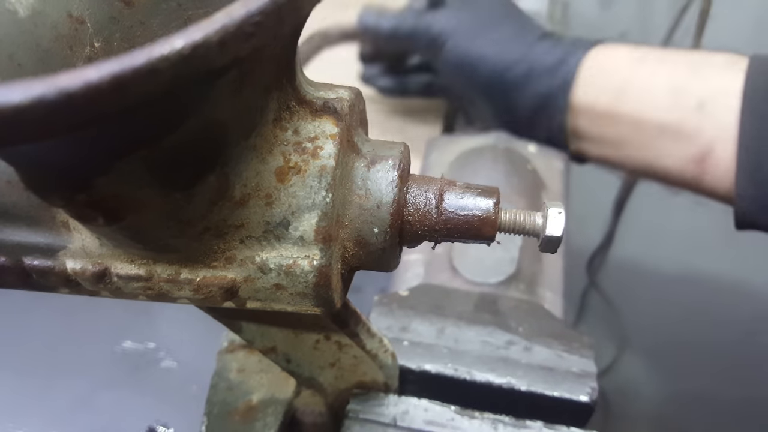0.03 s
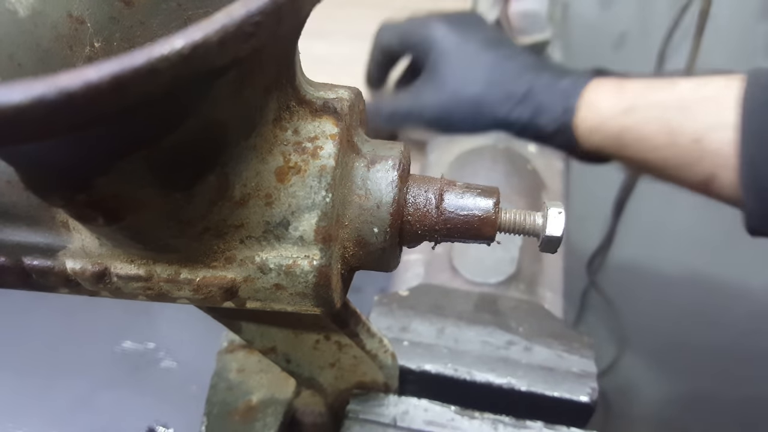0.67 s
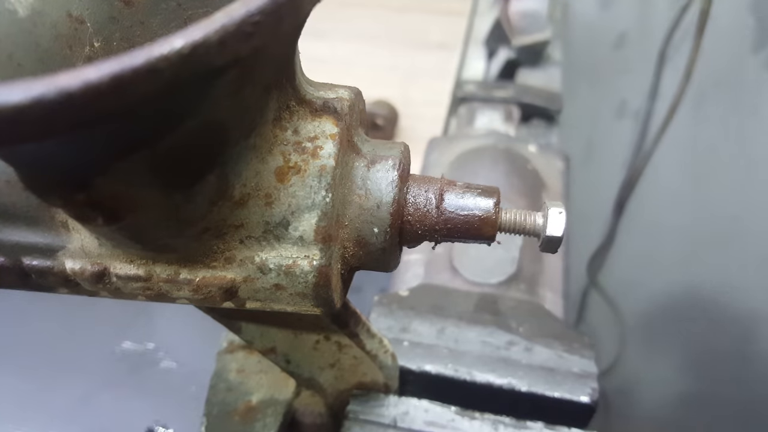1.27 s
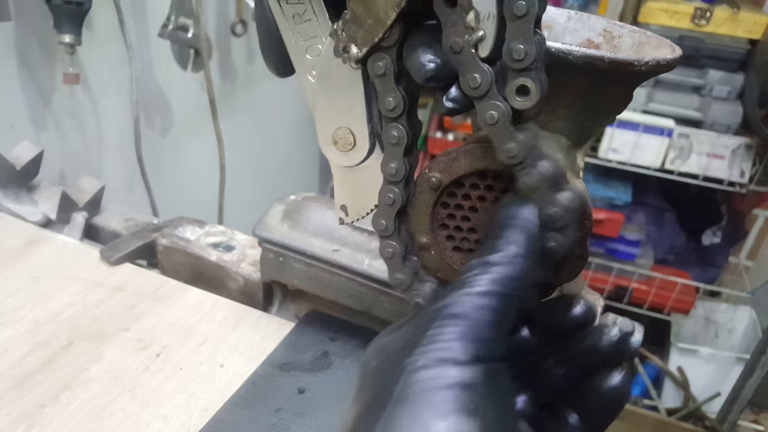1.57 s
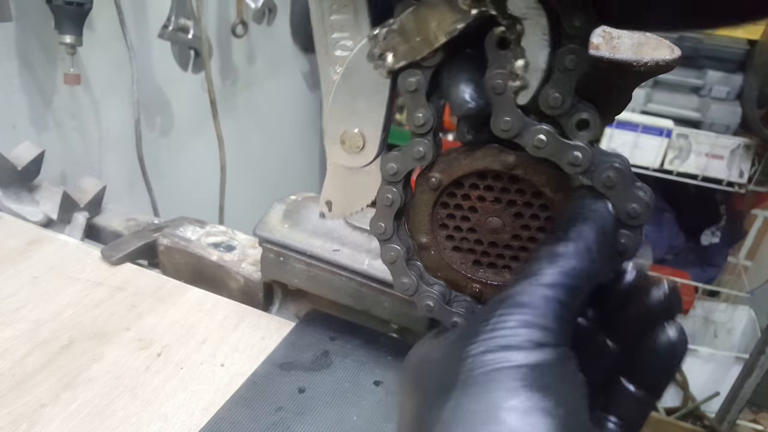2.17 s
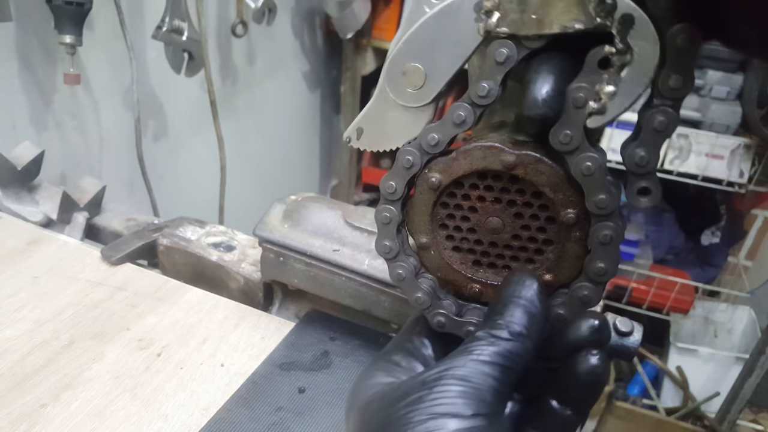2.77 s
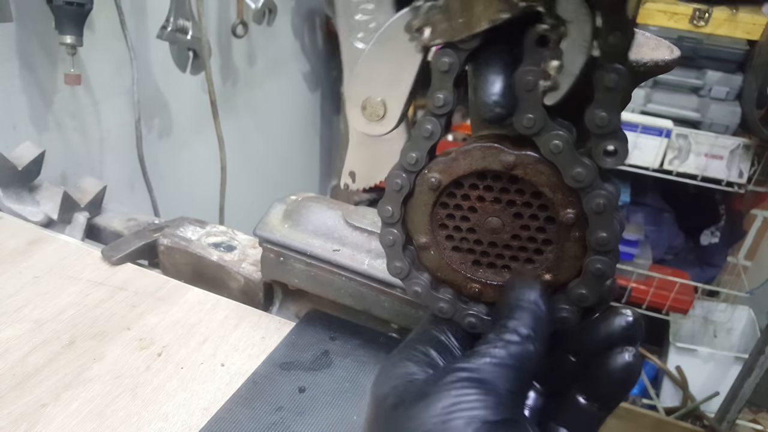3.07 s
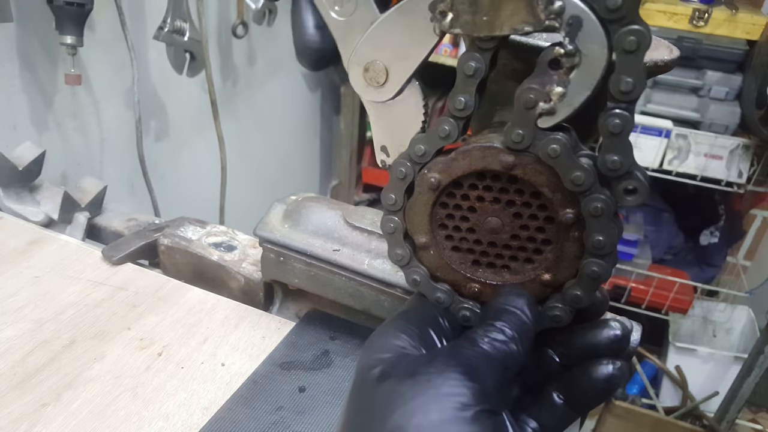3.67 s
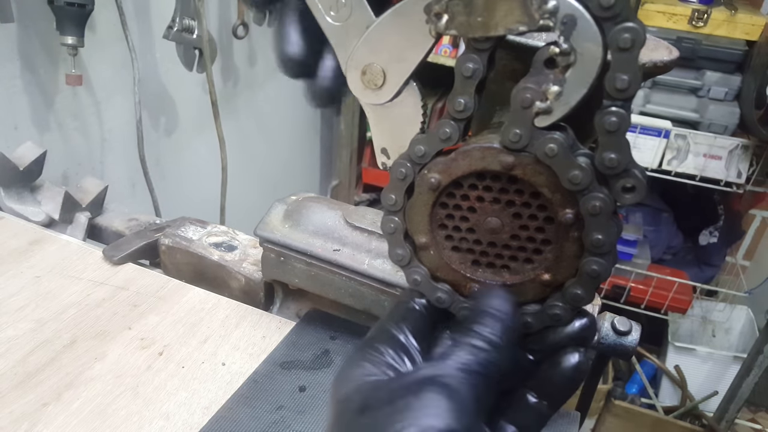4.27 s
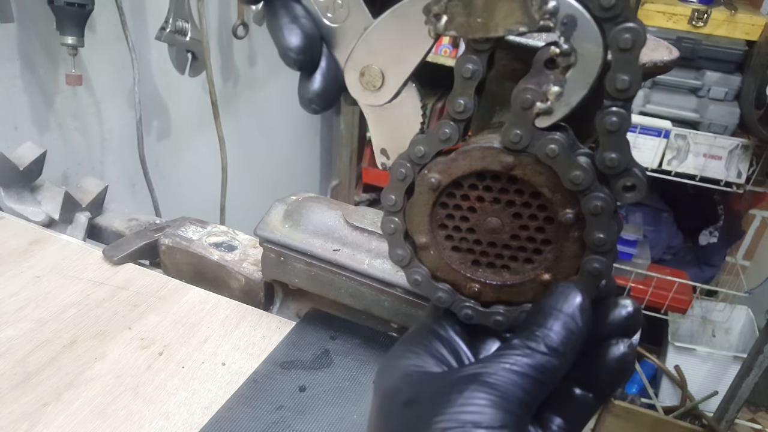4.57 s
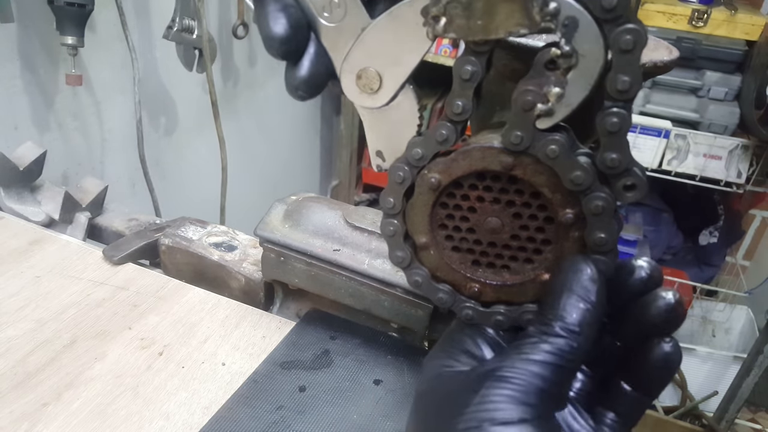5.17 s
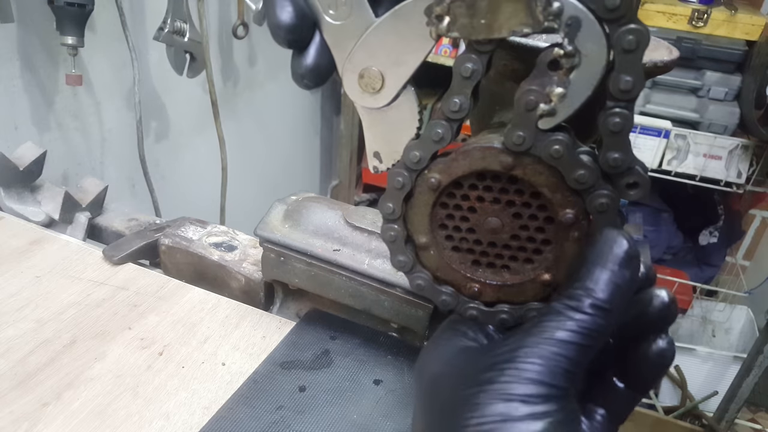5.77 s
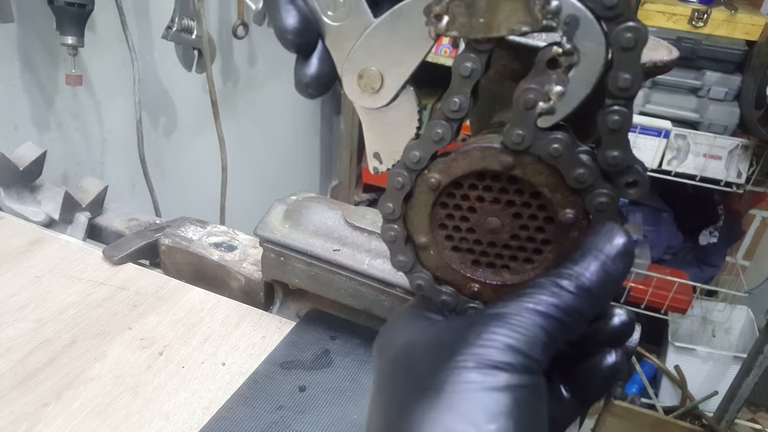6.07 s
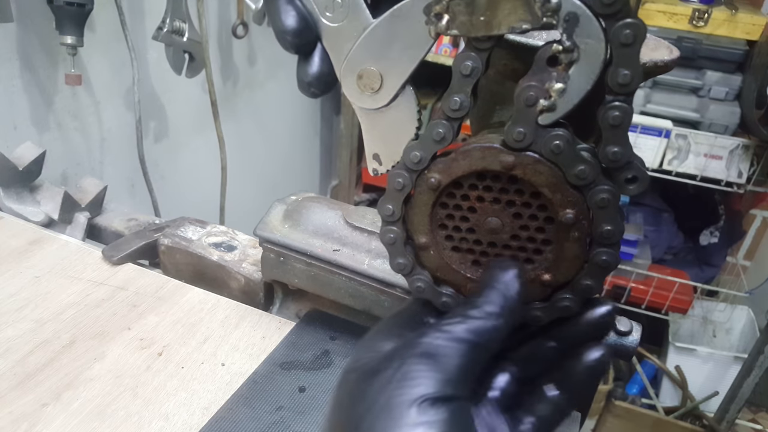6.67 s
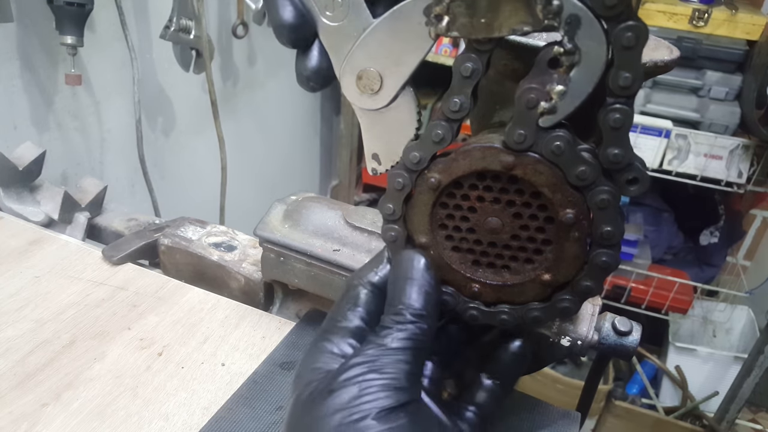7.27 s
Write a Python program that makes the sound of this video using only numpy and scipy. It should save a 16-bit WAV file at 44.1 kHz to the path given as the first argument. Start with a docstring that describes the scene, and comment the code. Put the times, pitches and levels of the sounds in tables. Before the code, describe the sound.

Close by in a small, quiet workshop, a metal tool bumps a bench several times with a hollow boom. Then a steel chain rattles and scrapes over rusty cast iron, with low rumbles as it is pulled. A bright snap of the wrench jaw stands out midway. The clinks then become lighter and more scattered, with the faint rub of a rubber glove between them.

```python
"""In a small workshop, a chain wrench is picked up from a bench with a few heavy knocks.
Its chain is then wrapped round a cast-iron grinder held in a vice. The links and the jaw
clink and scrape on the iron, and each tug on the chain makes the bench rumble.
A rubber glove hisses along the chain. Everything is close by, over a quiet background."""
import sys
import numpy as np
from scipy import signal
from scipy.fft import rfft, irfft
from scipy.io import wavfile
from scipy.ndimage import uniform_filter1d

SR = 44100
rng = np.random.default_rng(int(sys.argv[2]) if len(sys.argv) > 2 else 0)


def materialize(psi):
    """Save the field psi as 16-bit PCM at rate SR to the path in sys.argv[1].

    A 1-D psi becomes a single channel; in a 2-D psi each row is a channel.
    """
    bounded = np.clip(np.atleast_2d(psi).T, -1, 1)
    quanta = np.round(bounded * 32767).astype(np.int16)
    wavfile.write(sys.argv[1], SR, quanta)


N = 327222
SIZE = 16384  # samples in one short sound
AGE, BINS = np.arange(SIZE) / SR, np.fft.rfftfreq(SIZE, 1 / SR)  # its times/s and frequencies/Hz

# tone colour of steel ticking on iron: f/Hz, level/dB
TICK_COLOUR = [(1000, -11), (3000, -3.5), (5000, -4.5), (6300, -1), (7500, -1), (8800, 1), (10000, -22),
               (12500, -24), (15500, -41.5)]
# tone colour of the iron's dull clack: f/Hz, level/dB
CLACK_COLOUR = [(100, -6), (280, -6), (450, 0), (850, -5.5), (1200, 3.5), (1500, -2.5), (1850, -3.5),
                (2800, -14), (4000, -14), (9000, -66.5)]
# tones of a link, soon stopped by its neighbours: f/Hz, level/dB, ring time/s (to fade by 60 dB)
LINK_TONES = [(1150, -18, 0.15), (1280, -15, .12), (1820, -3.5, 0.07), (3410, 8, 0.015), (3427, 0.5, 0.075),
              (3522, 4.5, .018), (3748, -14.5, 0.07), (4903, -31.5, 0.026), (6480, -26.5, 0.051),
              (7000, -25.5, 0.052), (8430, -43, 0.058), (9320, -35.5, 0.031)]


def knocks(swell_s=0.0073):
    """Each blow of the wrench cracks at once and the handle clanks; the bench takes a moment to boom."""
    # blows on bench and vice: t/s, crack level/dB, boom level/dB, clank level/dB, dulled above f/Hz
    blows = [(0.0, -39.5, -34.5, -48.5, 247), (0.0996, -19, -30.5, -37, 1800),
             (0.109, -46.5, -17.5, -59, 137.6), (0.127, -24, -27, -57, 800),
             (0.1954, -16.5, -27.5, -21, 2000), (0.457, -31.5, -29, -49, 550),
             (0.4918, -9.5, -11, -20.5, 1196), (0.507, -17, -25, -29, 609), (2.9174, -51, -53.5, -70, 1208),
             (3.0626, -36, -41.5, -56, 893), (4.631, -55.5, -56, -64, 1200),
             (4.7313, -67.5, -79, -61.5, 3000), (5.431, -64, -45.5, -61, 186.4),
             (6.1047, -73, -73, -61.5, 2500)]
    # tone colour of the crack: f/Hz, level/dB
    crack_colour = [(60, -22), (200, -4.5), (400, -2), (560, 2), (680, 8.5), (820, 4.5), (1000, -3),
                    (1800, -11.5), (2600, -15), (3300, -20), (4200, -28), (8000, -37), (15000, -38.5)]
    # tones of the bench top: f/Hz, level/dB, ring time/s
    bench_tones = [(94, -21.5, 0.42), (125.5, -6, .42), (143.9, -12.5, 0.4), (168.1, -2, 0.39),
                   (202.2, 0, .31), (259.8, 1, .24), (277, 1.5, .22), (325, -5.5, 0.26), (377, -2, 0.28),
                   (519.5, 2.5, 0.14), (607.6, -1, .2), (669, -1.5, .18), (735, -5, .16), (775, -6, 0.12),
                   (862, -7.5, 0.15)]
    # tones of the wrench handle: f/Hz, level/dB, ring time/s
    handle_tones = [(600.6, -6.5, 0.056), (750, -1.5, 0.056), (920.6, -6, .05), (1056, 0, 0.05),
                    (1080, -6, 0.068), (1388, -3, 0.07), (1462, -1, .05), (1620, -2.5, 0.037),
                    (1869, -5, 0.032), (1990, -8.5, 0.03507), (2185, -10.5, 0.03), (2430, -13.5, .025),
                    (3120, -15, 0.025)]
    out = np.zeros((2, N))
    bench_hz = np.array(bench_tones)[:, 0]
    for s, crack_db, boom_db, clank_db, dull_hz in blows:
        crack = pulse(read(crack_colour, BINS) + dulled(BINS, dull_hz))
        crack = in_room(crack, near_db=2, near_s=0.0042, room_db=3, build_s=0.021)
        add(out, s, amp(crack_db) * crack)
        boom = ring(bench_tones, spread_db=3, tilt_db=dulled(bench_hz, dull_hz, slope=2.9), scatter=0)
        add(out, s, amp(boom_db) * unit_attack(boom * swell(swell_s)))
        clank = unit_attack(ring(handle_tones, spread_db=3.5) * swell(0.00066))
        clank = in_room(clank, near_db=-3.5, near_s=0.0058, room_db=-2, build_s=0.0065)
        add(out, s, amp(clank_db) * clank)
    return out


def clinks(snap_gain_db=-1, clack_gain_db=-1, link_gain_db=-6, link_pan_db=-2.5):
    """The steel chain ticks on the iron and bounces: the iron clacks and the link rings briefly."""
    # chain strikes: t/s, tick level/dB, clack level/dB, link level/dB, snap level/dB
    strikes = [(1.4934, -66, -52.5, -66, -74.5), (1.522, -71, -44.5, -70, -79),
               (1.5882, -70, -66, -38, -73), (1.6687, -59, -45.5, -29.5, -74),
               (1.7099, -63, -46.5, -42, -75), (1.7246, -63, -42.5, -39, -73),
               (1.814, -51.5, -53, -51, -76), (1.8638, -49, -44.5, -45.5, -67),
               (1.8929, -60, -43.5, -45, -51), (1.9262, -65, -44, -47, -61), (1.947, -55, -71, -70, -44),
               (1.9734, -56, -69, -65, -67), (2.016, -49.5, -54, -76, -41), (2.343, -62, -54.5, -48.5, -62),
               (2.3615, -58.5, -72, -58, -45), (2.6039, -55, -49, -68, -73),
               (2.7159, -42.5, -63, -44.5, -43), (2.7472, -43, -55, -44, -65),
               (2.7728, -52.5, -62, -44, -75), (2.9181, -57.5, -50, -61, -77),
               (3.0627, -37, -35, -38.5, -66), (3.3734, -73, -50.5, -56.5, -56),
               (3.4768, -43, -53, -55, -56), (3.482, -37, -40.5, -38, -40), (3.4988, -39, -41, -54, -59),
               (3.5322, -44, -47, -48, -69), (3.609, -53, -62, -52, -60), (3.638, -57.5, -52.5, -80, -73),
               (3.7384, -61, -52, -69, -77), (4.1347, -67, -67, -72, -80), (4.373, -54.5, -85, -77, -48),
               (4.6319, -59.5, -50.5, -55, -76), (4.6763, -60, -53, -72, -69),
               (4.7324, -54, -56.5, -54.5, -81), (5.1766, -65, -54, -61, -79), (5.3932, -60, -53, -66, -75),
               (5.4149, -50, -48, -42.5, -58), (5.427, -59, -54, -59, -48), (5.464, -76, -43, -58, -71),
               (5.485, -49.5, -62, -72, -46), (6.106, -60, -50.5, -79, -82),
               (6.2731, -54, -52.5, -62.5, -78), (6.3155, -64, -68, -62.5, -62.5),
               (6.3774, -71, -78, -71, -81), (6.4551, -71, -58.5, -64, -83)]
    # tone colour of the bright snap: f/Hz, level/dB
    snap_colour = [(1000, -54), (7000, -33), (10000, -3.5), (12600, 4), (14500, -14), (15800, 12)]
    out = np.zeros((2, N))
    tick, snap, clack = (pulse(read(c, BINS)) for c in (TICK_COLOUR, snap_colour, CLACK_COLOUR))
    for s, tick_db, clack_db, link_db, snap_db in strikes:
        contact = amp(tick_db) * tick + amp(snap_db + snap_gain_db) * snap
        add(out, s, in_room(contact, near_db=12.5, near_s=0.0035, room_db=6, build_s=0.00087))
        iron = in_room(clack, near_db=10.5, near_s=0.0055, room_db=11.5, build_s=0.0019)
        add(out, s, amp(clack_db + clack_gain_db) * iron)
        link = bounce(ring(LINK_TONES, spread_db=7), gap_s=.003, loss_db=-6)
        link = amp(link_db + link_gain_db) * link
        link = in_room(link, near_db=-9, near_s=0.0095, room_db=-10, build_s=0.0028)
        add(out, s, amp([[link_pan_db], [-link_pan_db]]) * link)  # louder on the right
    return out


def jaw(delay_samples=3):
    """The toothed jaw snaps against the chain; it rings longer when it hangs free."""
    # the jaw catches: t/s, level/dB, brightness/(dB per octave), ring time multiplier
    hits = [(0.102, -45, -17, 9.6), (1.8154, -55, -9, 1.5), (3.373, -55, -9.5, 2.2), (3.478, -36, 5, 1.2),
            (3.496, -39, -1, 1), (3.4998, -23.5, 9.5, 1.2), (3.581, -49, 9, .7), (3.5907, -45, -6, 1.3),
            (4.7324, -52, -3, .8), (5.178, -61.5, -11, 1.8), (5.482, -46, -23, 1.1)]
    # tones of the jaw: f/Hz, level/dB, ring time/s
    tones = [(4270, -12, 0.0088), (4490, 8, 0.019), (4560, 2, 0.038), (6030, 6.5, 0.026),
             (7000, -6.5, .018), (7230, 9, 0.018), (7520, 0, 0.035), (8400, -5, 0.012), (9310, -6.5, 0.009)]
    out = np.zeros((2, N))
    octaves = np.log2(np.array(tones)[:, 0] / tones[0][0])
    for s, db, bright_db, hold in hits:
        ping = unit_attack(ring(tones, spread_db=0, tilt_db=bright_db * octaves, hold=hold))
        left, right = amp(db) * in_room(ping, near_db=-9.5, near_s=0.00067, room_db=-18.5, build_s=.006)
        add(out, s, np.array([left, np.roll(right, delay_samples)]))  # reaches the left side first
    return out


def rumble(drag, smooth_samples=1500):
    """The chain's rollers bump over the iron and shake vice and bench, as hard as it is dragged."""
    # tone colour of the shaking vice and bench: f/Hz, level/dB
    colour = [(25, -25), (48, -21), (65, -9.5), (88, -12.5), (116, 6), (137, -13.5), (162, 4.5), (195, -16),
              (230, -5.5), (275, -11.5), (340, -26), (480, -24), (700, -28.5), (1500, -62)]
    shake = pair(rng.standard_normal((2, N)), colour)
    loudness = np.sqrt(uniform_filter1d((shake ** 2).mean(0), smooth_samples))
    return drag * shake / loudness


def scrape(drag, gain_db=-2.5, drag_db=-24, patchy_db=2, sing_db=-17, spurt_samples=500):
    """Links catch and slip on the rust in spurts and ring a little; any drag scrapes faintly."""
    # steel scraping on rusty iron: t/s, held for/s, level/dB
    strokes = [(0.01, .05, -51), (0.075, .015, -48.5), (1.505, .035, -56), (1.63, 0.081, -50.5),
               (1.88, 0.047, -59.5), (2.32, 0.053, -60), (2.61, 0.016, -50.5), (2.72, 0.023, -50),
               (3.0, 0.21, -70.5), (3.46, 0.13, -60), (3.69, 0.042, -51.5), (5.41, 0.039, -64),
               (6.28, .06, -66)]
    # tone colour of the scrape: f/Hz, level/dB
    colour = [(200, -15.5), (500, -2.5), (850, 2), (1250, 6), (1850, 4.5), (2300, 0.5), (2950, -3.5),
              (3470, -16), (4100, -7), (7000, -17), (11000, -25.5), (15500, -20.5)]
    wander = uniform_filter1d(rng.standard_normal(N), spurt_samples)
    spurts = amp(patchy_db * unit(uniform_filter1d(wander, spurt_samples)))
    slips = friction(per_s=700, spread_db=-3.5, smooth=0.95) * spurts
    link = ring(LINK_TONES, spread_db=0.5, hold=1.3)
    singing = signal.oaconvolve(slips, link[None], axes=1)[:, :N]
    grit = unit(pair(slips, colour)) + amp(sing_db) * unit(singing)
    push = effort(strokes, rise_db_per_s=678, fall_db_per_s=223.5)
    return grit * (amp(gain_db) * push + amp(drag_db) * drag)


def rattle(drag, per_s=22, spread_db=2, clack_db=-19, tick_db=-25, link_db=-27, links=4):
    """Slack links tap the iron at random, as hard as the chain is dragged; each has its own ring."""
    out = np.zeros((2, N))
    clack = amp(clack_db) * pulse(read(CLACK_COLOUR, BINS))
    tick = amp(tick_db) * pulse(read(TICK_COLOUR, BINS))
    for _ in range(links):
        moments = rng.random(N) < per_s / links / SR
        taps = moments * drag * amp(spread_db * rng.standard_normal(N))
        tap = clack + tick + amp(link_db) * unit_attack(ring(LINK_TONES, spread_db=4.5))
        tap = in_room(tap, near_db=9.5, near_s=0.0025, room_db=6.5, build_s=0.0087)
        out += signal.oaconvolve(taps[None], tap, axes=1)[:, :N]
    return out


def glove():
    """Rubber slides on steel with a fine hiss that swells and lets go gently."""
    # the grip shifts along the chain: t/s, held for/s, level/dB
    slides = [(0.1, .17, -64), (1.57, 0.48, -68.5), (2.15, 1.15, -68.5), (2.61, .19, -67),
              (3.17, .025, -60), (3.46, 0.027, -52), (3.7, 0.087, -71), (4.04, .07, -70),
              (4.375, 0.092, -58.5), (4.965, 0.022, -52), (5.73, 0.016, -67.5), (6.69, .15, -65),
              (6.88, 0.041, -57.5), (7.06, .07, -61.5)]
    # tone colour of the sliding rubber: f/Hz, level/dB
    colour = [(500, -25), (1000, -11.5), (1700, -1.5), (2800, -3), (3700, -5), (5500, -2), (7300, 2.5),
              (8500, 1), (10000, -14), (12300, -6.5), (15800, -19.5)]
    hiss = unit(pair(friction(per_s=840, spread_db=5.5, smooth=1.8), colour))
    return hiss * effort(slides, rise_db_per_s=314, fall_db_per_s=220)


def rubs():
    """The rubber catches and slips briefly, each time hissing around a different pitch."""
    # short rubs: middle t/s, length/s, level/dB, f/Hz, width/octaves
    catches = [(0.261, 0.057, -60, 3470, 0.74), (2.217, 0.12, -65, 5040, 0.59),
               (2.693, 0.26, -65, 6960, 0.16), (2.903, 0.12, -67.5, 6640, 0.082),
               (3.334, 0.054, -65, 4900, 0.28), (6.028, 0.088, -66, 5585, 0.58),
               (6.13, 0.059, -67.5, 5890, 0.46), (6.504, 0.15, -74.5, 5710, 0.22)]
    out = np.zeros((2, N))
    slips = friction(per_s=1200, spread_db=0, smooth=0.69)
    for s, length_s, db, hz, octaves in catches:
        start = s - length_s / 2
        piece = slips[:, round(start * SR):][:, :SIZE]
        band = np.exp(-.5 * (np.log2((BINS + 1) / hz) / octaves) ** 2)
        hiss = unit(irfft(rfft(piece, SIZE) * band))
        arch = np.sin(np.pi * np.minimum(AGE / length_s, 1))
        add(out, start, amp(db) * hiss * arch)
    return out


def air(level_db=-67):
    """The quiet, steady background noise of the workshop."""
    # tone colour of the background: f/Hz, level/dB
    colour = [(12, -34.5), (20, -1), (32, -22), (53, -3), (177, -12), (310, -13.5), (718, -19),
              (1220, -21.5), (1480, -23), (1810, -22), (2080, -23.5), (3070, -26), (4940, -29),
              (16000, -36)]
    return amp(level_db) * unit(pair(rng.standard_normal((2, N)), colour))


def in_room(sound, near_db, near_s, room_db, build_s, ring_s=0.24, bass_ring_s=0.4, bass_hz=282):
    """The direct sound, quick echoes off nearby metal, then the room's echo, longer in the bass."""
    echoes = pair(rng.standard_normal((2, SIZE)))
    bass = signal.sosfilt(signal.butter(2, bass_hz, fs=SR, output="sos"), echoes)
    fade, bass_fade = (np.exp(-np.log(1000) * AGE / s) for s in (ring_s, bass_ring_s))
    tail = (echoes * fade + bass * (bass_fade - fade)) * swell(build_s)
    near = echoes[:, ::-1] * np.exp(-np.minimum(AGE / near_s, 20))
    paths = (amp(near_db) * unit(near) + amp(room_db) * unit(tail)) / np.sqrt(SIZE)
    paths[:, 0] += 1  # the direct sound
    return irfft(rfft(sound) * rfft(paths)) / np.sqrt(1 + amp(near_db) ** 2)


def ring(tones, spread_db, tilt_db=0, hold=1, scatter=1):
    """A struck object's fading tones; each point of contact gives a different mix of them."""
    hz, db, ring_s = np.transpose(tones)[:, :, None]
    level_luck, phase_luck = rng.standard_normal((2, len(hz), 1))
    db = db + np.reshape(tilt_db, (-1, 1)) + spread_db * level_luck
    fade = np.exp(-np.log(1000) * AGE / (ring_s * hold))
    return (amp(db) * fade * np.sin(2 * np.pi * (hz * AGE + scatter * phase_luck))).sum(0)


def bounce(sound, gap_s, loss_db, count=3):
    """A loose part bounces a few times, each time weaker, at uneven gaps."""
    out = sound[None].copy()
    for k, s in enumerate(np.cumsum(gap_s * (.5 + rng.random(count)))):
        add(out, s, amp(loss_db * (k + 1)) * sound)
    return unit_attack(out[0])


def friction(per_s, spread_db, smooth):
    """Tiny slips of uneven size over a smooth hiss."""
    slips = (rng.random(N) < per_s / SR) * amp(spread_db * np.minimum(rng.exponential(1, N), 4))
    return unit(slips * rng.choice([-1, 1], (2, N))) + smooth * rng.standard_normal((2, N))


def effort(moves, rise_db_per_s, fall_db_per_s, step=32):
    """Loudness over time of some hand movements: each swells, holds and dies away."""
    t = np.arange(0, N, step) / SR
    s, held_s, db = np.transpose(moves)[:, :, None]
    early_s, late_s = np.maximum(s - t, 0), np.maximum(t - s - held_s, 0)
    each = amp(db - rise_db_per_s * early_s - fall_db_per_s * late_s)
    return np.interp(np.arange(N) / SR, t, np.sqrt((each ** 2).sum(0)))


def pair(x, colour=None):
    """Turns two unrelated noises into left and right, alike in the bass, with an optional colour."""
    # how alike the two sides are: f/Hz, likeness (1 = the same)
    likeness = [(60, 1), (150, 0.78), (300, 0.99), (640, -0.22), (1400, 0.088), (3100, 0.21), (6800, -.12),
                (15000, 0)]
    hz = np.fft.rfftfreq(x.shape[1], 1 / SR)
    a, b = rfft(x)
    same = np.clip(read(likeness, hz), -1, 1)
    mid, side = a * np.sqrt(1 + same), b * np.sqrt(1 - same)
    gain = 1 if colour is None else amp(read(colour, hz))
    return irfft(np.array([mid + side, mid - side]) * gain, x.shape[1]) / np.sqrt(2)


def pulse(db):
    """The shortest click that has this level at each frequency."""
    log_gain = np.log(amp(np.r_[db, db[-2:0:-1]]))
    spectrum = np.exp(np.conj(signal.hilbert(log_gain)))
    return unit_attack(np.fft.ifft(spectrum).real)


def dulled(hz, corner_hz, slope=1):
    """A softer blow loses its high tones: the change in dB at each frequency."""
    return -10 * np.log10(1 + (hz / corner_hz) ** (2 * slope))


def swell(rise_s):
    """A smooth rise from 0 to 1."""
    return 1 - np.exp(-(AGE / rise_s) ** 2)


def amp(db):
    """Turns decibels into a multiplier."""
    return 10 ** (np.asarray(db) / 20)


def unit(x):
    """Scales a sound to an average strength (rms) of 1."""
    return x / np.sqrt(np.mean(x ** 2) + 1e-20)


def unit_attack(x, size=176):
    """Scales a sound so that its loudest 4 ms have a strength of 1."""
    return x / np.sqrt(uniform_filter1d(x ** 2, size, mode="constant").max())


def read(points, hz):
    """Reads between the rows of a frequency table, on a pitch scale."""
    f, value = np.transpose(points)
    return np.interp(np.log(hz + 1), np.log(f + 1), value)


def add(mix, s, sound):
    """Mixes a short sound in at time s."""
    part = mix[:, max(round(s * SR), 0):][:, :SIZE]
    part += sound[..., :part.shape[1]]


def scene():
    """All sources in stereo; the pull on the chain drives rumble, scrape and rattle."""
    # the hand tugs the chain over the iron: t/s, held for/s, level/dB
    tugs = [(1.515, 0.18, -48.5), (1.67, 0.26, -47.5), (1.92, 0.01, -37.5), (1.98, .02, -42.5),
            (2.14, .02, -49), (2.28, .02, -54.5), (2.36, 0.038, -45.5), (2.43, .015, -49),
            (2.52, 0.049, -56.5), (2.635, 0.014, -44), (2.76, 0.037, -42.5), (2.94, 0.091, -43),
            (3.08, 0.026, -36), (3.41, .015, -48), (3.5, 0.02, -35), (3.59, 0.1, -44),
            (3.755, 0.029, -42.5), (4.44, .02, -66.5), (4.645, .04, -57), (4.705, .025, -50.5),
            (4.84, .02, -52.5), (4.98, 0.042, -57.5), (5.19, 0.022, -52.5), (5.295, 0.016, -55),
            (5.435, 0.075, -39), (5.58, 0.025, -46.5), (5.75, 0.073, -63), (5.98, .015, -68.5),
            (6.13, 0.017, -66.5), (6.285, 0.028, -48), (6.41, 0.17, -60), (7.245, 0.041, -61.5)]
    drag = effort(tugs, rise_db_per_s=876, fall_db_per_s=142.5)  # bites at once; the bench rings on
    wrench = knocks() + clinks() + jaw() + rumble(drag) + scrape(drag) + rattle(drag)
    return wrench + glove() + rubs() + air()


def record(dry, top_hz=15850):
    """Makes the right side a little louder at most pitches and cuts the very highest treble."""
    # balance of the two microphones: f/Hz, left minus right level/dB
    balance = [(60, -2.5), (140, -3), (280, -3.5), (600, -2), (1300, -1.06), (2400, -0.6), (3800, -2),
               (8000, -3), (15000, 2)]
    tilt_db = read(balance, np.fft.rfftfreq(N, 1 / SR)) / 2
    heard = irfft(rfft(dry) * amp([tilt_db, -tilt_db]), N)
    treble_cut = signal.firwin(511, top_hz, window=("kaiser", 9), fs=SR)
    return signal.oaconvolve(heard, treble_cut[None], "same")


dry = scene()
out = record(dry)
materialize(out)
```